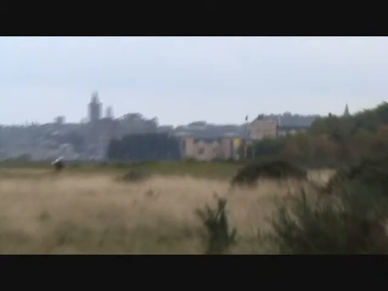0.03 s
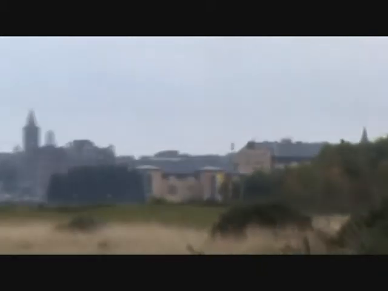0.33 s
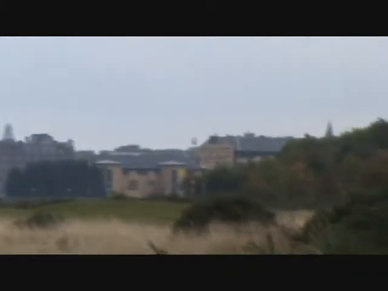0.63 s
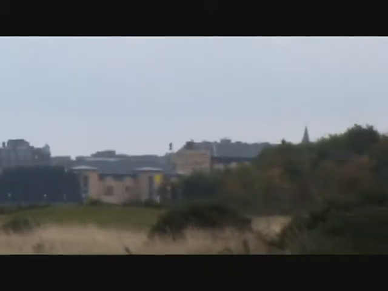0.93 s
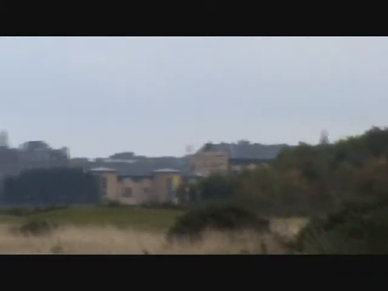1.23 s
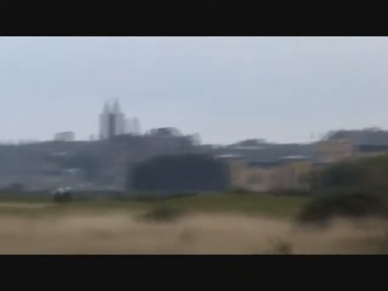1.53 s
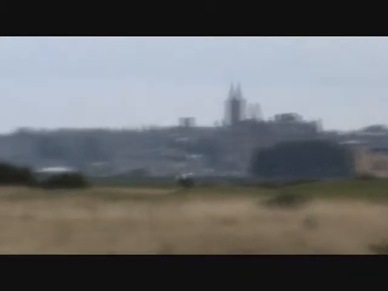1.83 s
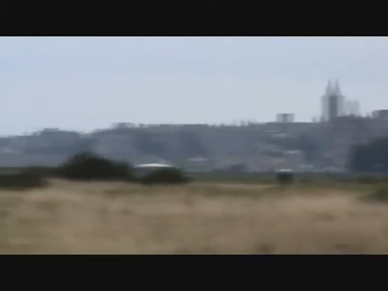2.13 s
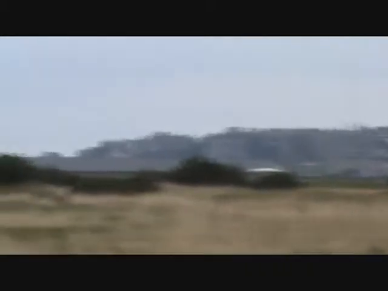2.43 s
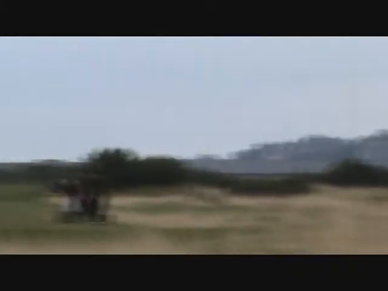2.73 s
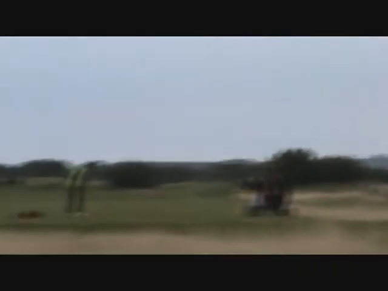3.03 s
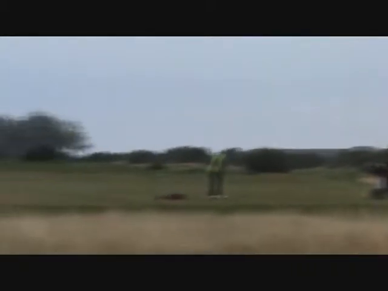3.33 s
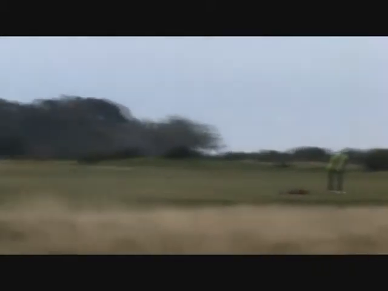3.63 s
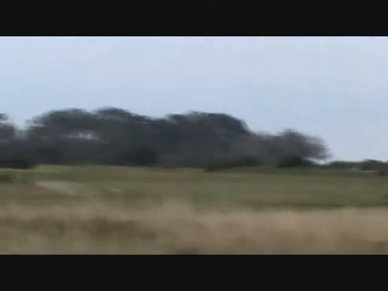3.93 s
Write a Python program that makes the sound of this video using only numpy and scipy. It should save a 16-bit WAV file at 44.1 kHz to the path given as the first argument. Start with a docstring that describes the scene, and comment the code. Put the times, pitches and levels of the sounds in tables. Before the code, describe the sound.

Two sharp, ringing clicks and a short rattle, with microphone handling and faint outdoor traffic.

```python
"""An open golf course, heard from a hand-held camera with two microphone ports.
Close to the microphone, small hard parts tick, knock twice, each knock with its own bright ring,
and rattle to rest; a faint, brief high hiss comes just before the first knock.
The hand bumps the hollow housing and slides on the grip; two thin whines come and go.
Farther off are the rush of distant traffic, a light wind and a few faint bird pips."""
import sys
import numpy as np
from scipy import signal
from scipy.fft import rfft, irfft
from scipy.io import wavfile
from scipy.ndimage import uniform_filter1d

SR = 44100
rng = np.random.default_rng(int(sys.argv[2]) if len(sys.argv) > 2 else 0)


def generate_wav(sig):
    """Save sig (samples, or channels by samples) to the path in sys.argv[1] as 16-bit PCM at SR."""
    pcm = np.round(np.clip(np.atleast_2d(sig).T, -1, 1) * 32767).astype(np.int16)
    wavfile.write(sys.argv[1], SR, pcm)


N = 176400

# one knock on each of two parts (time [s], body [dB], crack [dB], ring [dB], pitch [Hz], t60 [s])
KNOCKS = [(0.872, -29.5, -39.5, -17.5, 3792, 0.036), (.9420, -31, -37, -14, 3920, 0.027)]
# overtones of the lower and the higher part (frequency [Hz], level [dB], t60 [s])
LOW_PART_MODES = [(4130, -32, 0.053), (4630, -43, .05), (4732, -37, 0.052), (5330, -47, .04),
                  (5990, -25, 0.015), (6250, -37, 0.049), (7780, -35, 0.022), (8900, -46, .03),
                  (10000, -50, .06)]
HIGH_PART_MODES = [(4050, -29, 0.023), (4150, -41, 0.082), (5340, -35, 0.048), (5860, -36, .03),
                   (6169, -37, 0.086), (6955, -44, .063), (9040, -41, .04), (10100, -49, .06),
                   (10600, -48, .025), (12950, -52, .025)]
# bounces of the closing rattle (time [s], body [dB], crack [dB], jingle [dB])
BOUNCES = [(1.0036, -33.5, -39.5, -46), (1.0085, -38, -43, -56), (1.0134, -49, -43.5, -51),
           (1.0150, -35, -40, -51), (1.2345, -66, -76, -69)]
# small metal part, hollow housing, housing damped by the hand (frequency [Hz], gain [dB], t60 [s])
JINGLE_MODES = [(2810, 3, 0.047), (6169, -1, .1), (6895, -3, 0.11), (7160, -5, 0.045), (8500, -2, .06),
                (9550, -1, 0.035), (12869, -8, 0.12)]
HOUSING_MODES = [(311, 0, .07), (728.7, -2, 0.13), (1103, -8, 0.042), (1416, 2, 0.023), (1495, -5, 0.027)]
PRESSED_MODES = [(360, -2, 0.036), (657, -0.5, 0.04)]
# ticks and, at 0.857 s, a faint, brief high hiss (time [s], level [dB], spectral peak [Hz])
TICKS_AND_HISS = [(0.15, -56.5, 6600), (.472, -62.5, 7000), (0.571, -59.5, 5860), (0.7706, -47.5, 6700),
                  (0.805, -53, 6440), (0.822, -54, 6100), (.857, -51, 7060), (0.9394, -47, 6660),
                  (0.9648, -50, 6200), (0.9937, -44.5, 7060), (1.033, -53, 6300), (1.066, -55.5, 8900),
                  (1.082, -56, 4050), (1.1307, -57.5, 6140), (1.233, -58.5, 3860), (2.738, -65, 5900)]
# soft bumps of the hand (time [s], level [dB], pitch [Hz], t60 [s], scuff [dB])
BUMPS = [(0.055, -36, 90, 0.12, -60), (0.1518, -22.5, 308, 0.039, -48), (0.281, -34.5, 66, 0.055, -57),
         (.314, -36.5, 150, 0.12, -49), (0.4207, -24, 318, 0.04, -33), (.4254, -24.5, 195, 0.052, -42),
         (0.4316, -23, 170, 0.054, -30.5), (0.4425, -33, 235, 0.05, -34), (0.473, -26.5, 145, 0.038, -44),
         (0.555, -41.5, 190, 0.049, -48), (1.067, -41, 277, 0.13, -55), (3.112, -34, 86, 0.059, -50),
         (3.145, -39, 152, 0.04, -50), (3.363, -32.5, 202, 0.036, -45.5), (3.436, -32, 280, 0.043, -46),
         (3.448, -29.5, 161, 0.065, -48), (3.462, -33.5, 125, .045, -45.5), (3.469, -37, 412, 0.039, -54),
         (3.492, -34, 115, 0.036, -49), (3.563, -32, 71.5, 0.048, -45.5)]
# slides on the grip (centre [s], level [dB], half width [s])
RUSTLES = [(.44, -67, 0.062), (1.99, -69, 0.056), (3.98, -67, .03)]
# faint whines (start [s], end [s], level [dB], pitch [Hz])
WHINES = [(2.83, 3.32, -77.5, 4795), (3.64, 4, -80, 6870)]
# far bird pips (centre [s], level [dB], pitch [Hz])
PIPS = [(1.168, -64, 5530), (1.232, -67, 5530), (1.396, -66, 5530), (1.464, -65, 5530), (2.004, -72, 7520),
        (2.165, -73, 6490), (2.232, -68, 5530), (2.264, -66, 5530), (2.332, -72, 6490), (3.43, -71, 6750)]
# spectra of the close sounds (frequency [Hz], gain [dB])
BODY_COLOUR = [(60, -33), (170, -8), (280, 5), (500, -1.5), (750, -1.5), (1100, 0), (1800, -6), (2400, -20),
               (3200, -32), (6000, -31), (16000, -60)]
CRACK_COLOUR = [(500, -11), (3000, -4), (4300, 2), (6200, 1.5), (8200, -5.5), (10300, -8), (11300, -22),
                (13000, -19), (16000, -36)]
CLATTER_COLOUR = [(500, -27), (2800, 1.5), (4000, -1), (4700, -7.5), (6000, -6), (7300, 2.5), (8250, -3),
                  (9600, 5.5), (10300, -11.5), (13300, -7), (15500, -33)]
BRIGHT_COLOUR = [(500, -24), (2800, -7), (4000, 8), (5300, -3), (6700, -2), (8000, -3.5), (10000, -3),
                 (11500, -16), (16000, -27)]
SCUFF_COLOUR = [(30, -17), (90, -1), (200, 4), (400, 0), (650, -7.5), (850, -23), (2000, -24), (8000, -60)]
RUSTLE_COLOUR = [(2000, -11), (4300, 9), (7000, 5), (9500, -5), (14000, -18)]
# spectra of the background (frequency [Hz], gain [dB])
TRAFFIC_COLOUR = [(150, -23.5), (250, -15), (436, -13.5), (616, -7.5), (672, -5.5), (1090, -1.5),
                  (1420, -8.5), (1810, -10.5), (3680, -26.5), (5390, -33), (6520, -36), (15000, -42.5),
                  (15800, -38)]
WIND_COLOUR = [(20, -28), (40, -6), (62, 2.5), (85, -4), (125, -2), (200, -9), (300, -15.5), (500, -31.5),
               (1500, -48.5)]
# swells of the background (time [s], level [dB])
TRAFFIC_LEVEL = [(0, -45), (.35, -46), (.7, -45), (1.2, -44.5), (1.95, -44.5), (2.35, -46), (2.6, -45.5),
                 (3.2, -46), (4, -45)]
WIND_LEVEL = [(0, -45.5), (.1, -50.5), (.2, -53), (.33, -45), (.39, -52), (.55, -50.5), (.9, -54),
              (1.5, -56), (2.2, -58.5), (2.8, -51.5), (3.25, -54), (3.5, -47), (3.7, -50.5), (4, -51.5)]
# shift of the traffic as the camera turns (time [s], left minus right [dB])
CAMERA_TURN = [(0, 0), (1.7, 0.5), (2.8, 0.5), (3.3, 1)]
# likeness of the open air at the two ports (frequency [Hz], coherence [0-1])
AIR_COHERENCE = [(50, .93), (120, .72), (300, .8), (700, .94), (1100, .94), (1500, .85), (2100, .8),
                 (4000, .36), (6500, .3), (11000, .46)]
# its balance between the ports (frequency [Hz], left minus right [dB])
AIR_BALANCE = [(300, 0), (750, -2.5), (1500, -4), (3000, -4.5), (4300, -2), (10000, -0.5)]
# phase between the ports, for open air and for sounds on the housing (frequency [Hz], left lead [rad])
AIR_LEAD = [(60, -.15), (150, -.43), (750, -.76), (1100, -.7), (1600, -.55), (4000, -.56), (10000, 0)]
NEAR_LEAD = [(40, -.3), (120, -1.05), (250, -1.2), (1300, -.9), (2600, -.3), (3900, .05), (12000, 0)]


def knocks():
    """Two hard knocks at close range: a dull blow, a crack and a strong short ring with overtones."""
    out = np.zeros((2, N))
    for (s, body_db, crack_db, ring_db, hz, t60), modes in zip(KNOCKS, (LOW_PART_MODES, HIGH_PART_MODES)):
        body = burst(BODY_COLOUR, t60=0.056, scatter_db=-1.5, tail_t60=0.3, tail_db=-5.5, side_db=-8)
        crack = burst(CRACK_COLOUR, t60=0.0071, scatter_db=1, tail_t60=0.19, tail_db=-4.5, side_db=-10)
        add(out, s, amp(body_db) * body)
        add(out, s + 0.000898, amp(crack_db) * crack)
        add(out, s + 0.00025, ring([(hz, ring_db, t60)] + modes, rise_s=0.00066))
    return out


def rattle():
    """Quick bounces shake the hollow housing and set a small metal part jingling."""
    out = np.zeros((2, N))
    jingle = ring(JINGLE_MODES, rise_s=0.00027)
    housing = ring(HOUSING_MODES, rise_s=0.00073)
    for s, body_db, crack_db, jingle_db in BOUNCES:
        body = burst(BODY_COLOUR, t60=0.024, scatter_db=1.5, tail_t60=0.33, tail_db=-2.5, side_db=-16)
        crack = burst(CLATTER_COLOUR, t60=0.0084, scatter_db=2, tail_t60=0.13, tail_db=-8, side_db=-9)
        add(out, s, amp(body_db) * body + amp(crack_db) * crack)
        add(out, s, amp(jingle_db) * jingle + amp(body_db + 3.5) * housing)
    return out


def ticks_and_hiss():
    """Close ticks of loose parts, and a faint, brief high hiss just before the first knock."""
    out = np.zeros((2, N))
    for s, db, hz in TICKS_AND_HISS:
        bright = burst(BRIGHT_COLOUR, t60=0.01, scatter_db=6, tail_t60=0.087, tail_db=2, side_db=-19,
                       peak_hz=hz, peak_db=11.5)
        add(out, s, amp(db) * bright)
    return out


def bumps():
    """The hand pushes the housing: a few round low cycles, and a muffled scuff that rings it briefly."""
    out = np.zeros((2, N))
    housing = ring(PRESSED_MODES, rise_s=0.0014)
    for s, db, hz, t60, scuff_db in BUMPS:
        thump = ring([(hz, db, t60)], rise_s=0.0014)
        scuff = burst(SCUFF_COLOUR, t60=0.027, scatter_db=11, tail_t60=0.16, tail_db=5.5, side_db=-7)
        add(out, s, thump + amp(scuff_db) * housing)
        add(out, s, amp(scuff_db) * scuff)
    return out


def rustles():
    """The hand slides on the grip in soft swells of hiss."""
    t = np.arange(N) / SR
    swells = sum(amp(db) * np.exp(-0.5 * ((t - s) / width) ** 2) for s, db, width in RUSTLES)
    return swells * air(RUSTLE_COLOUR, patchy_db=1.5)


def whines(fade_s=0.05):
    """Two thin, steady tones come and go, one after the other."""
    out, t = np.zeros(N), np.arange(N) / SR
    for start, end, db, hz in WHINES:
        fade = np.clip(np.minimum(t - start, end - t) / fade_s, 0, 1)
        out += amp(db) * fade * np.sin(2 * np.pi * hz * t)
    return out


def traffic():
    """Distant traffic: a steady rush that shifts slightly between the ports as the camera turns."""
    turn = np.sqrt(level(CAMERA_TURN))
    return np.array([turn, 1 / turn]) * level(TRAFFIC_LEVEL) * air(TRAFFIC_COLOUR, patchy_db=0.97)


def wind():
    """Light wind: a low rumble that swells and sinks."""
    return level(WIND_LEVEL) * air(WIND_COLOUR, patchy_db=1.0)


def birds(pip_s=0.024):
    """Short, nearly pure pips from far off."""
    out, t = np.zeros((2, N)), np.arange(0, pip_s, 1 / SR)
    arch = np.sin(np.pi * t / pip_s)
    for s, db, hz in PIPS:
        add(out, s - pip_s / 2, amp(db) * arch * np.sin(2 * np.pi * hz * t))
    return out


def ring(modes, rise_s):
    """A struck part rings as dying sines, from rows (frequency [Hz], level [dB], t60 [s])."""
    t = np.arange(SR // 3) / SR
    attack = 1 - np.exp(-t / rise_s)
    return attack * sum(amp(db - 60 * t / t60) * np.sin(2 * np.pi * hz * t) for hz, db, t60 in modes)


def burst(colour, t60, scatter_db, tail_t60, tail_db, side_db, peak_hz=1000, peak_db=0):
    """A click, quick scatter and a longer tail of noise, with the energy of 10 ms at rms 1."""
    size = 8192
    t, hz = np.arange(size) / SR, abs(np.fft.fftfreq(size, 1 / SR))
    click = unit_rms(1.0 * (t == 0))
    scatter, tail, side_scatter, side_tail = (
        unit_rms(rng.standard_normal(size) * amp(-60 * t / decay_s))
        for decay_s in (t60, tail_t60, t60, tail_t60))
    mid = click + amp(scatter_db) * scatter + amp(tail_db) * tail
    side = amp(side_db + scatter_db) * side_scatter + 0.5 * amp(tail_db) * side_tail
    boost_db = peak_db / (1 + ((hz - peak_hz) / 450) ** 2)
    log_gain = np.log(amp(at_hz(colour, hz) + boost_db))
    response = np.exp(np.conj(signal.hilbert(log_gain)))  # minimum phase keeps the onset sharp
    out = np.fft.ifft(np.fft.fft([mid + side, mid - side]) * response).real
    return unit_rms(out) * np.sqrt(0.01 * SR / size)


def air(colour, patchy_db):
    """Outdoor noise with drifting louder and softer patches, as the two ports pick it up."""
    hz = np.fft.rfftfreq(2048, 1 / SR)
    noise = rng.standard_normal((5, N // 512 + 5, len(hz)))
    left, unrelated = noise[0] + 1j * noise[1], noise[2] + 1j * noise[3]
    patches = uniform_filter1d(noise[4], size=7, axis=0)  # smooth over time, then frequency
    patches = unit_rms(uniform_filter1d(patches, size=20, axis=1))
    coherence = at_hz(AIR_COHERENCE, hz)
    right = coherence * left + np.sqrt(1 - coherence ** 2) * unrelated
    right *= np.exp(-1j * at_hz(AIR_LEAD, hz))
    lean = amp(at_hz(AIR_BALANCE, hz) / 2)
    spectra = np.array([left * lean, right / lean]) * amp(at_hz(colour, hz) + patchy_db * patches)
    _, out = signal.istft(spectra.swapaxes(1, 2), nperseg=2048, noverlap=1536)
    return unit_rms(out[:, :N])


def amp(db):
    """Decibels to gain."""
    return 10 ** (np.asarray(db) / 20)


def unit_rms(x):
    """Scales to rms 1."""
    return x / np.sqrt(np.mean(x ** 2) + 1e-20)


def at_hz(points, hz):
    """Reads a table on a log-frequency axis."""
    frequency, value = np.transpose(points)
    return np.interp(np.log(hz + 1), np.log(frequency + 1), value)


def level(curve):
    """Gain over time from rows (time [s], level [dB])."""
    return amp(np.interp(np.arange(N) / SR, *np.transpose(curve)))


def add(mix, s, sound):
    """Mixes a sound in at time s."""
    part = mix[:, max(round(s * SR), 0):][:, :sound.shape[-1]]
    part += sound[..., :part.shape[1]]


def scene():
    """Handling right at the microphone; traffic, wind and birds behind."""
    near = knocks() + rattle() + ticks_and_hiss() + bumps()
    lead = at_hz(NEAR_LEAD, np.fft.rfftfreq(N, 1 / SR))
    at_ports = irfft(rfft(near) * np.exp(0.5j * np.array([lead, -lead])), N)
    return at_ports + rustles() + whines() + traffic() + wind() + birds()


def record(dry):
    """The recorder cuts off the highest treble."""
    edge_hz = 15900
    lowpass = signal.firwin(511, edge_hz, window=("kaiser", 9), fs=SR)
    return signal.oaconvolve(dry, lowpass[None], "same")


dry = scene()
out = record(dry)
generate_wav(out)
```